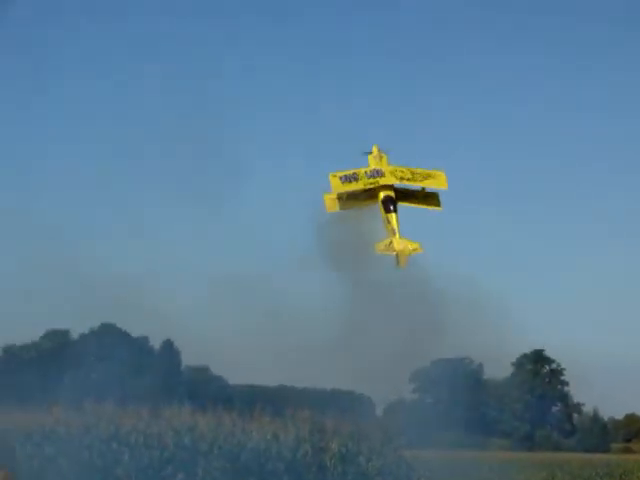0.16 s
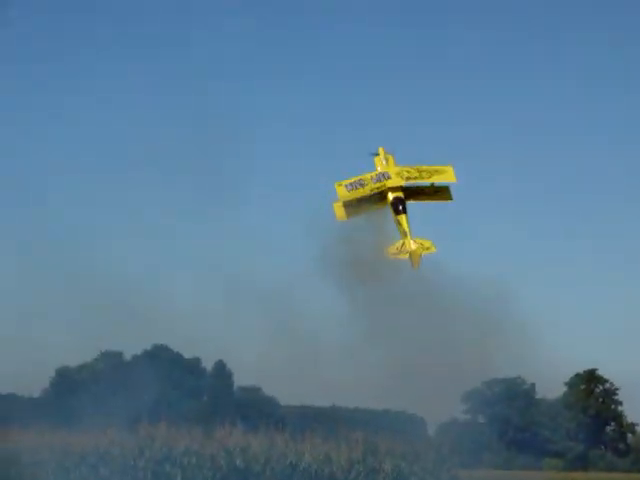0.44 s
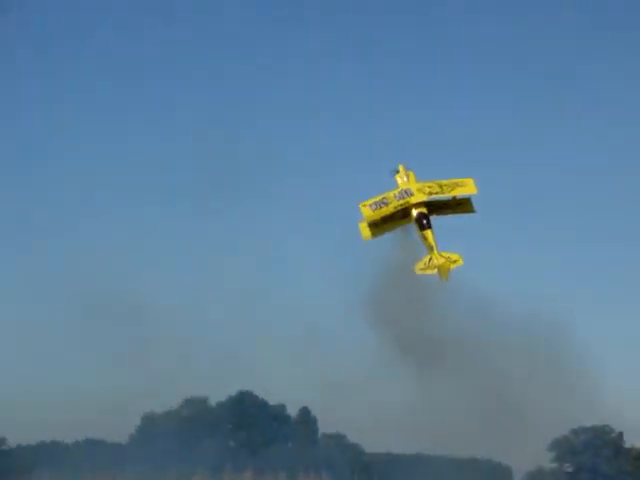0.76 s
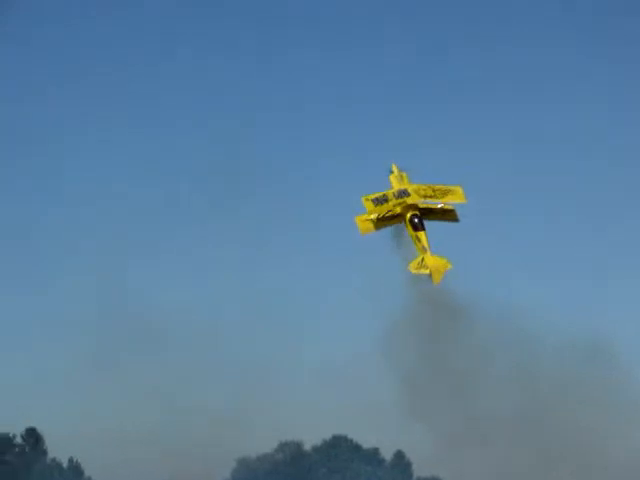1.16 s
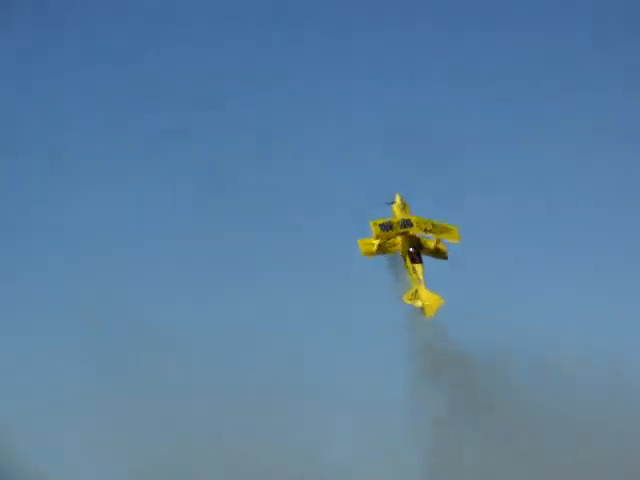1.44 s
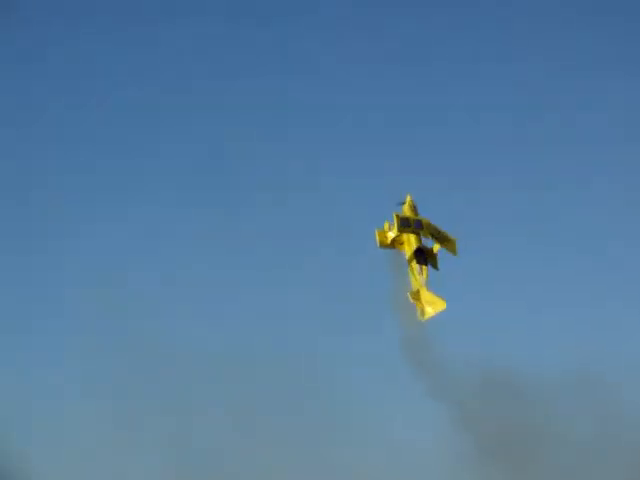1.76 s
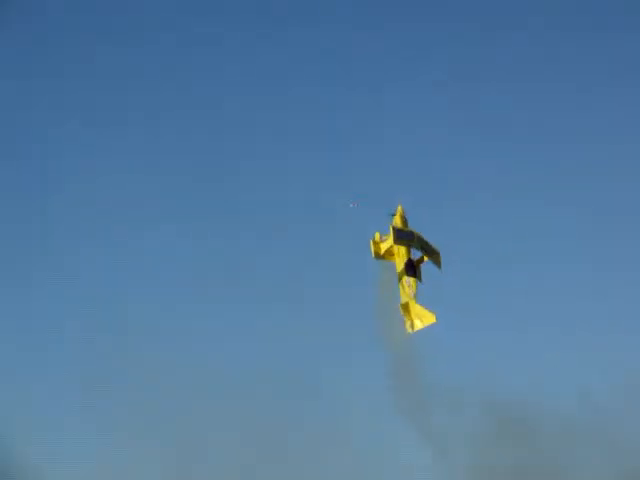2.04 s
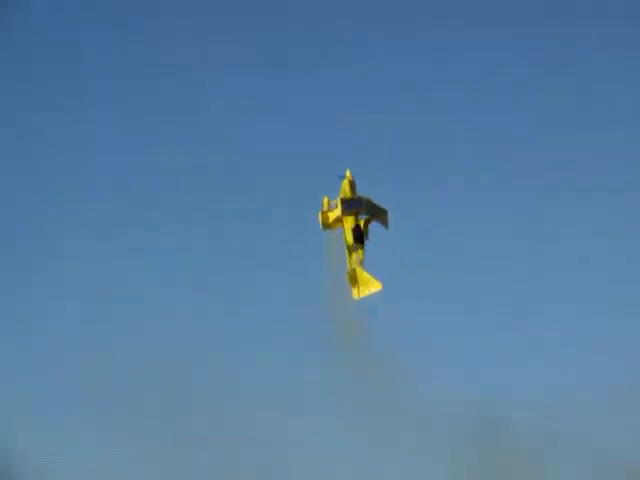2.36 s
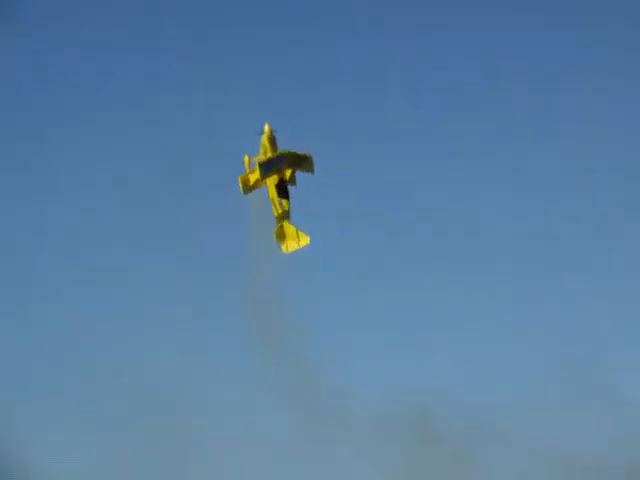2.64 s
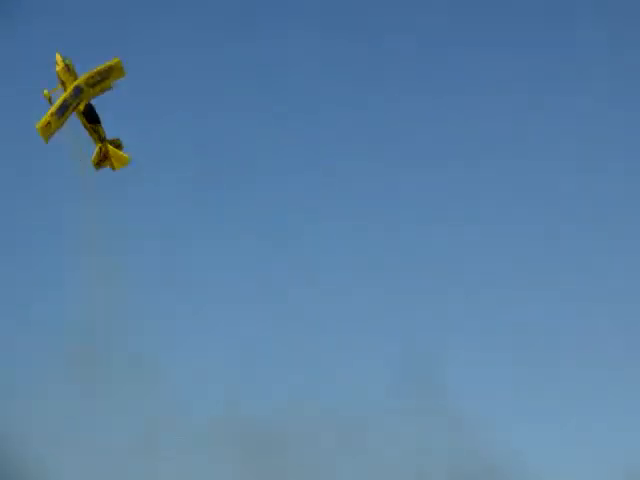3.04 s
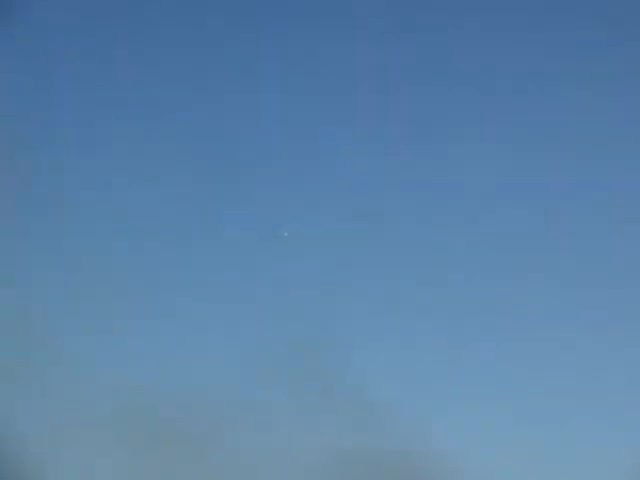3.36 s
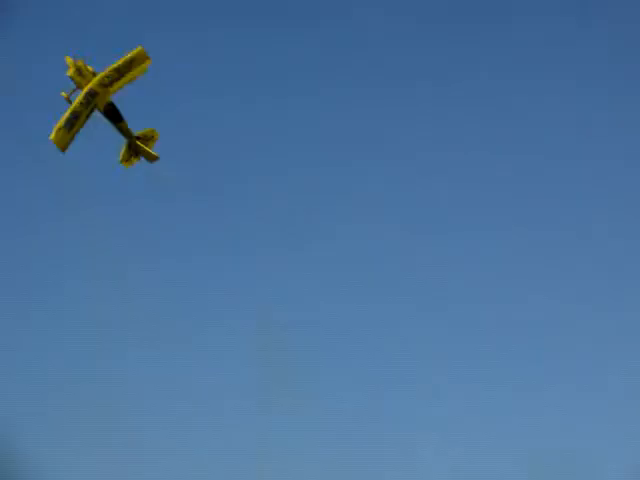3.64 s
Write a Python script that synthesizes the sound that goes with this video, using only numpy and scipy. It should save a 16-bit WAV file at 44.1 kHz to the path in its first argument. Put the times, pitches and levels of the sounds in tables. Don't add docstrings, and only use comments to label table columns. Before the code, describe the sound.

A petrol model aeroplane engine buzzes raw and loud, wavering, then climbing to a steady humming drone.

```python
import sys
import numpy as np
from scipy import signal
from scipy.io import wavfile
from scipy.ndimage import uniform_filter1d, map_coordinates

SR = 44100
rng = np.random.default_rng(int(sys.argv[2]) if len(sys.argv) > 2 else 0)


def transcribe(u):
    v = np.clip(np.atleast_2d(u).T, -1, 1)
    q = np.round(v * 32767).astype(np.int16)
    wavfile.write(sys.argv[1], SR, q)


def undo_db(level):
    steps = np.asarray(level, float) / 20
    return 10 ** steps


N = 168021

# (time [s], shaft speed [turns/s], blade hum [dB], exhaust [dB],
# # cowl ringing [dB], slipstream [dB])
FLIGHT_LEVELS = [(0.0, 88.04, -34, -20, -23, -32), (0.07, 87.6, -41, -31.5, -35, -33.5),
                 (0.22, 89.4, -52, -17.5, -32.5, -33.5), (0.44, 97, -35.5, -18.5, -39, -31.5),
                 (0.69, 99.24, -29.5, -17, -22.5, -34), (0.9, 98.2, -30, -19, -35, -34),
                 (1.01, 93.47, -26.5, -25.5, -42, -36.5), (1.08, 90.46, -34, -26, -40, -39),
                 (1.17, 87.8, -37.5, -26.5, -25.5, -36), (1.36, 91.36, -27.5, -21, -29, -36),
                 (1.55, 87.95, -26, -24, -34, -36.5), (1.7, 89.8, -24, -18.5, -34.5, -34),
                 (2.0, 97.9, -14.5, -19.5, -33.5, -30.5), (2.17, 101.2, -13, -18.5, -13, -34),
                 (2.47, 102.8, -12, -22.5, -30, -33), (2.86, 103, -13.5, -21.5, -45, -37.5),
                 (3.38, 104.4, -15.5, -21.5, -42, -32.5), (3.81, 102.3, -23.5, -23.5, -58, -35.5)]
SHAFT_HZ, HUM_DB, ENGINE_DB, COWL_DB, HISS_DB = range(1, 6)

# (time [s], ground echo lag [ms], clean tone over rough exhaust [dB],
# brightness [dB per octave], low throb [dB], side shown [0 belly to 3 back], wind [dB])
VIEW_PATH = [(0, 1.545, 6, -1.5, -39, 1.3, -48), (.25, 1.67, 7, -2.5, -27.5, 0.38, -52),
             (.42, 1.81, 7, -0.5, -36, 0.086, -53), (.8, 1.86, 5.5, -0.5, -35, 0.05, -46),
             (1.1, 2.056, 7, -2.5, -40, 0.75, -54), (1.5, 2.09, 4.5, -5.5, -37, 0.65, -51),
             (1.85, 2.335, 3.5, 1, -42, 1.03, -50), (2.15, 2.64, 6.5, 2, -38.5, 1.57, -39.5),
             (2.45, 2.317, 10, 1, -32.5, 1.99, -44), (2.8, 2.834, 9.5, 0, -37, 2.02, -43.5),
             (3.1, 2.93, 11, -1, -33, 2.7, -54), (3.5, 3.26, 11, -1.5, -27, 3.08, -53),
             (3.68, 3.5, 8.5, -1, -27, 2.31, -52), (3.81, 4.4, 8.5, -2.5, -31, 2.34, -45)]
ECHO_MS, CLEAN_DB, BRIGHTNESS, THROB_DB, SIDE, WIND_DB = range(1, 7)

EXHAUST_TRIM_DB = -8.5


def unit(x):
    return x / np.sqrt(np.mean(x ** 2))


def curve(table, axis):
    rows = np.array(table, float)
    return np.interp(np.arange(N) / SR, rows[:, 0], rows[:, axis])


def ring(x, hz, width_hz):
    return signal.lfilter(*signal.iirpeak(hz, hz / width_hz, fs=SR), x)


def ring_twice(x, hz, width_hz):
    return ring(ring(x, hz, width_hz), hz, width_hz)


def walk(rate):
    hold = int(SR / rate)
    held = np.repeat(rng.standard_normal(400), hold)[:N]
    return 1.14 * uniform_filter1d(uniform_filter1d(held, hold), hold)


def pulses(turns, scatter_db, late_s):
    at = np.interp(np.arange(1, int(turns[-1])), turns, np.arange(N))
    lateness, loudness = rng.standard_normal((2000, 2))[:len(at)].T
    at = np.clip(at + late_s * SR * lateness, 0, N - 2)
    i = at.astype(int)
    size = undo_db(scatter_db * loudness)
    return np.bincount(i, size * (i + 1 - at), N) + np.bincount(i + 1, size * (at - i), N)


def coloured(points, flicker_db):
    hz_db = np.array(points, float)
    lowest, highest = hz_db[0, 0], min(hz_db[-1, 0], 11000)
    out = 0
    for hz in lowest * 2 ** np.arange(.25, np.log2(highest / lowest), .5):
        db = np.interp(np.log(hz), np.log(hz_db[:, 0]), hz_db[:, 1]) + flicker_db * walk(8.976)
        out = out + undo_db(db) * ring_twice(rng.standard_normal(N), hz, hz / 2)
    return out


def exhaust(turns):
    # (frequency [Hz], width [Hz], level [dB])
    can_modes = [(362, 330, -20.5), (773, 230, 3), (956, 26, -14.5), (1434, 129, 7.5), (1675, 690, -18.5),
                 (2170, 350, 0), (2750, 870, -6.5), (5000, 2000, -19)]
    gas_db = -3.5
    puff = rng.standard_normal(N) * (.5 + 1.3 * np.exp(-(turns % 1) / 0.094))
    drive = unit(pulses(turns, scatter_db=2.0, late_s=.00004)) + undo_db(gas_db) * unit(puff)
    brightness = curve(VIEW_PATH, BRIGHTNESS)
    can = 0
    for hz, width_hz, db in can_modes:
        level = undo_db(db + brightness * np.log2(hz / 1000) + 0.24 * walk(12))
        answer = ring_twice(drive, hz, width_hz * 1.47)
        can = can + level * np.roll(answer, rng.integers(SR // 100))
    return unit(can) * undo_db(curve(FLIGHT_LEVELS, ENGINE_DB) + EXHAUST_TRIM_DB)


def tone(turns):
    # (multiple of the shaft speed, level [dB])
    belly = [(1, -26), (2, -8), (3, -4), (4, -10.5), (5, -11.5), (6, 0.5), (7, -15.5), (8, 4.5), (9, -1.5),
             (10, -15.5), (11, -6), (12, -27), (13, -5.5), (14, 4.5), (15, -14), (16, -2.5), (17, -6),
             (18, -1), (19, -24), (20, -6.5), (21, -3), (22, -9.5), (23, -26), (24, -5.5)]
    rolling = [(1, -22), (2, -12), (3, 0), (4, -2.5), (5, -7), (6, -8), (7, -15), (8, -7), (9, -6.5),
               (10, -6.5), (11, -7), (12, -12), (13, -21.5), (14, -18.5), (15, -21), (16, -13.5),
               (17, -13.5), (18, -6.5), (19, -11.5), (20, -14), (21, -12), (22, -13), (23, -25.5),
               (24, -29.5)]
    flank = [(1, -33), (2, -22), (3, 0), (4, -16), (5, -35), (6, -4.5), (7, -21), (8, -18.5), (9, -14.5),
             (10, -27), (11, -53), (12, -22), (13, -9), (14, -8), (15, -23.5), (16, -22), (17, -23.5),
             (18, -22.5), (19, -44.5), (20, -15.5), (21, -18.5), (22, -23), (23, -35.5), (24, -24.5)]
    back = [(1, -37), (2, -11), (3, 0), (4, -36), (5, -16), (6, -7), (7, -12.5), (8, -4), (9, -7),
            (10, -15), (11, -48), (12, -8), (13, -5.5), (14, -16), (15, -19.5), (16, -24.5), (17, -21),
            (18, -27), (19, -23), (20, -19), (21, -30.5), (22, -25), (23, -28), (24, -28)]
    first = 4
    idle_hz, idle_sway_db = 96, .45
    side = np.clip(curve(VIEW_PATH, SIDE), 0, 3)
    brightness = curve(VIEW_PATH, BRIGHTNESS)
    sides = np.array([belly, rolling, flank, back], float)[:, first - 1:, 1]
    sides = sides - 10 * np.log10(np.sum(10 ** (sides / 10), axis=1, keepdims=True))
    high = -25.5 - 0.724 * np.arange(22) + 2.1 * rng.standard_normal(22) * np.ones((4, 1))
    uneven = uniform_filter1d(rng.standard_normal(500)[turns.astype(int)], size=120)
    idle = idle_sway_db * np.clip(idle_hz - curve(FLIGHT_LEVELS, SHAFT_HZ), 0, None)
    out = 0
    for k, side_db in enumerate(np.hstack([sides, high]).T, start=first):
        db = np.interp(side, np.arange(4), side_db) + brightness * np.log2(k / 10)
        db = db + (.8 + .07 * k + idle * k / 10) * walk(16)
        db = db - idle * k / 20 + .06 * k * uneven + glint_db(k)
        out = out + undo_db(db) * np.sin(2 * np.pi * (k * turns + rng.random()))
    level_db = curve(FLIGHT_LEVELS, ENGINE_DB) + EXHAUST_TRIM_DB + curve(VIEW_PATH, CLEAN_DB)
    return np.sqrt(2) * out * undo_db(level_db)


def glint_db(multiple):
    # (time [s], half length [s], frequency [Hz], gain [dB])
    glints = [(.31, .05, 935, 14), (.31, .05, 1400, 6), (.31, .05, 1760, 8), (.1, .15, 1100, -6),
              (.7, .05, 1780, 7), (1.3, .2, 1260, 7), (1.35, .25, 1620, -8), (1.82, .13, 560, -9),
              (2.0, .2, 675, 15), (1.98, .12, 775, -10), (.68, .2, 2075, 7), (.25, .08, 725, -8),
              (.7, .2, 690, -6), (1.62, .12, 985, 7), (3.3, .25, 2900, 6), (3.4, .12, 515, -7),
              (.6, .25, 1580, -5), (2.02, .08, 395, -7), (2.12, .05, 1005, 6), (2.04, .13, 2085, 11),
              (2.29, .11, 2040, 8), (2.07, .08, 1500, -8), (2.45, .35, 2880, 9), (2.5, .35, 3290, 8),
              (2.65, .15, 930, 4), (3.1, .15, 930, -5), (3.0, .2, 1550, 5), (3.72, .1, 1440, 9),
              (3.72, .1, 1340, 6), (3.74, .12, 515, 12), (3.76, .08, 2130, -6), (3.6, .06, 2070, 5)]
    width_hz = 45
    t = np.arange(0, N, 256) / SR
    hz = multiple * curve(FLIGHT_LEVELS, SHAFT_HZ)[::256]
    db = 0
    for middle, half, centre, gain in glints:
        db = db + gain * np.exp(-((t - middle) / half) ** 4 - ((hz - centre) / width_hz) ** 2)
    return np.interp(np.arange(N) / SR, t, db)


def hum(turns):
    return np.sqrt(2) * undo_db(curve(FLIGHT_LEVELS, HUM_DB) + .5 * walk(22)) * np.sin(6 * np.pi * turns)


def throb(turns):
    twice = undo_db(curve(VIEW_PATH, THROB_DB) + 2.9 * walk(7.4)) * np.sin(4 * np.pi * turns)
    once = undo_db(-51.5 + 1.8 * walk(4.9)) * np.sin(2 * np.pi * turns)
    return np.sqrt(2) * (twice + once)


def cowl_ringing(turns):
    each_turn = pulses(turns + .3, scatter_db=2.5, late_s=.00002)
    each_third = pulses(3 * turns + .4, scatter_db=3, late_s=.00003)
    ringing = ring_twice(each_turn + .5 * each_third, hz=2085, width_hz=230)
    return unit(ringing) * undo_db(curve(FLIGHT_LEVELS, COWL_DB) - 12.5)


def knocks():
    # (time [s], peak level [dB])
    hard_firings = [(0.1254, -16), (0.2698, -17.5), (0.3441, -15), (0.5008, -15.5), (0.604, -20.5),
                    (0.6639, -10), (0.6742, -11), (0.6954, -15), (0.7044, -9), (0.7243, -12), (0.7324, -24),
                    (0.7776, -21), (0.839, -13), (0.9288, -17.5), (1.7464, -20), (1.8861, -16.5),
                    (1.9057, -13.5), (1.9887, -14.5), (2.0103, -13), (2.0505, -12), (2.0827, -10.5),
                    (2.1106, -14.5), (2.161, -10), (2.1806, -11), (2.2012, -9), (2.337, -13.5),
                    (2.367, -14.5), (2.53, -19), (2.55, -12), (2.58, -11), (2.6, -14), (2.6095, -14.5),
                    (2.617, -17.5), (2.64, -15), (2.6963, -19), (2.7157, -16), (2.7357, -21),
                    (2.7836, -14.5), (2.9462, -13), (3.4855, -20)]
    # (frequency [Hz], width [Hz], level [dB])
    cowl_modes = [(1420, 200, -10), (1780, 200, -6), (2090, 190, 0), (2400, 250, -9), (2900, 330, -8)]
    rows = np.array(hard_firings)
    hit = np.zeros(N)
    hit[(rows[:, 0] * SR).astype(int)] = undo_db(rows[:, 1] - 10)
    return sum(undo_db(db) * ring_twice(hit, hz, width) * SR / width for hz, width, db in cowl_modes)


def slipstream(turns):
    # (frequency [Hz], level [dB per Hz])
    air_colour = [(120, -46), (200, -16.5), (354, -0.5), (533, -20), (588, -24.5), (991, 0), (1150, -14),
                  (9910, -23.5), (12900, -61), (21800, -120)]
    air = coloured(air_colour, flicker_db=0.77)
    treble = signal.sosfilt(signal.butter(4, [4000, 9000], "band", fs=SR, output="sos"), air)
    tips = unit(ring(rng.standard_normal(N), hz=5010, width_hz=980))
    tips = tips * undo_db(0.5 - 2.2 * curve(VIEW_PATH, SIDE))
    beat = 1 + .35 * np.sin(6 * np.pi * turns) + .3 * np.sin(2 * np.pi * turns)
    return (air / treble.std() + tips) * beat * undo_db(curve(FLIGHT_LEVELS, HISS_DB) - 2)


def ground_mirror(rough):
    lag = uniform_filter1d(curve(VIEW_PATH, ECHO_MS), size=4000) * SR / 1000
    mirror = map_coordinates(rough, [np.arange(N) - lag], order=1, mode="mirror")
    return undo_db(-4.5) * signal.lfilter(*signal.butter(1, 2580, fs=SR), mirror)


def wind():
    # (frequency [Hz], level [dB])
    wind_colour = [(22, -8.5), (50, -11), (90, -2.5), (130, -9), (170, -8.5)]
    return unit(coloured(wind_colour, flicker_db=2.5)) * undo_db(curve(VIEW_PATH, WIND_DB))


def scene():
    turns = np.cumsum(curve(FLIGHT_LEVELS, SHAFT_HZ) * (1 + 0.00096 * walk(30.07))) / SR
    rough = exhaust(turns) + cowl_ringing(turns) + slipstream(turns)
    rough = signal.sosfilt(signal.butter(4, 122, "high", fs=SR, output="sos"), rough)
    gusts = wind()
    mix = rough + ground_mirror(rough) + knocks() + tone(turns) + hum(turns) + throb(turns) + gusts
    return mix[None]


def holes(x):
    share, from_hz = .05, 5000
    hz, _, z = signal.stft(x, SR, nperseg=512)
    bins, frames = z.shape[1:]
    keep = rng.random((bins // 7 + 1, frames // 2 + 1)) > share
    keep = np.repeat(np.repeat(keep, 7, 0), 2, 1)[:bins, :frames]
    keep = keep | (hz[:, None] < from_hz)
    return signal.istft(z * keep, SR, nperseg=512)[1][:, :N]


def top_cut(x):
    return signal.sosfilt(signal.butter(12, 10060, fs=SR, output="sos"), x)


def record(dry):
    patchy = holes(np.tanh(-dry))
    cut = signal.sosfilt(signal.ellip(10, .2, 80, 10120, fs=SR, output="sos"), patchy)
    return top_cut(cut)


dry = scene()
out = record(dry)
transcribe(out)
```